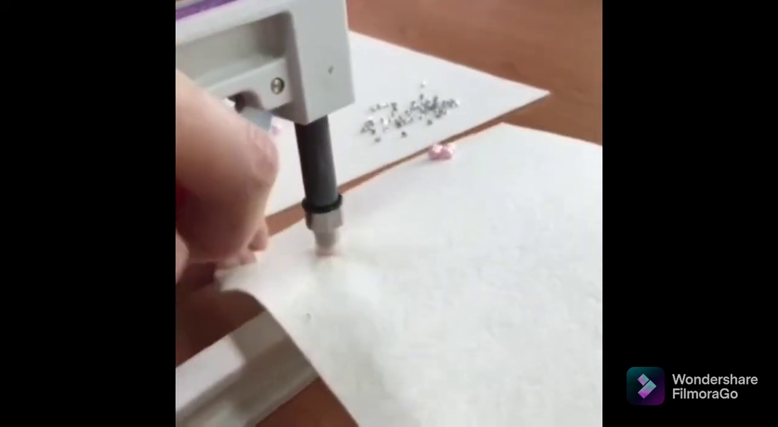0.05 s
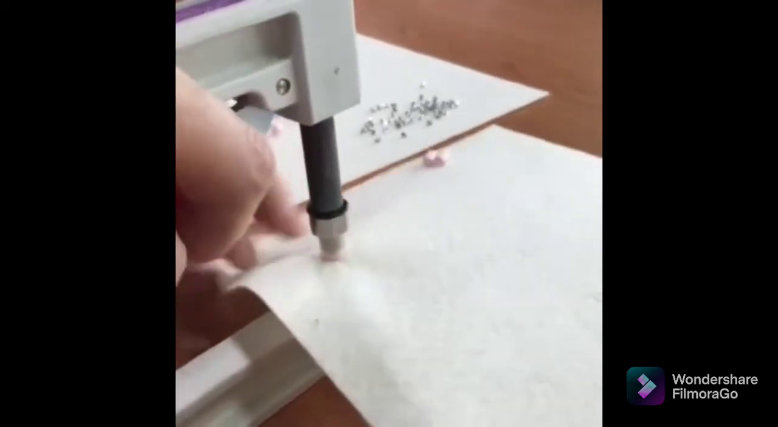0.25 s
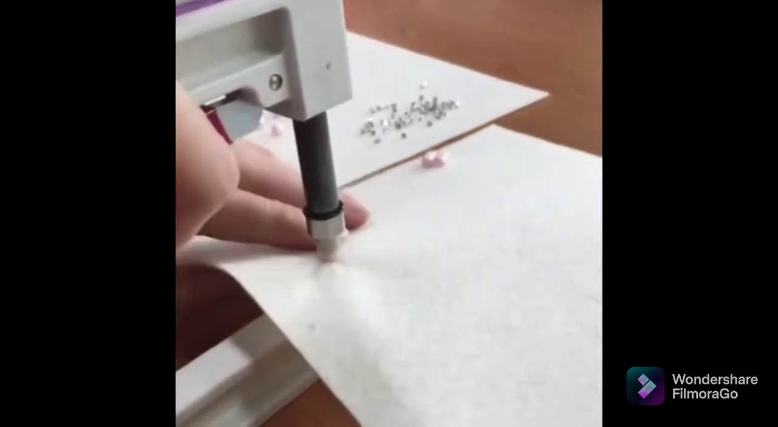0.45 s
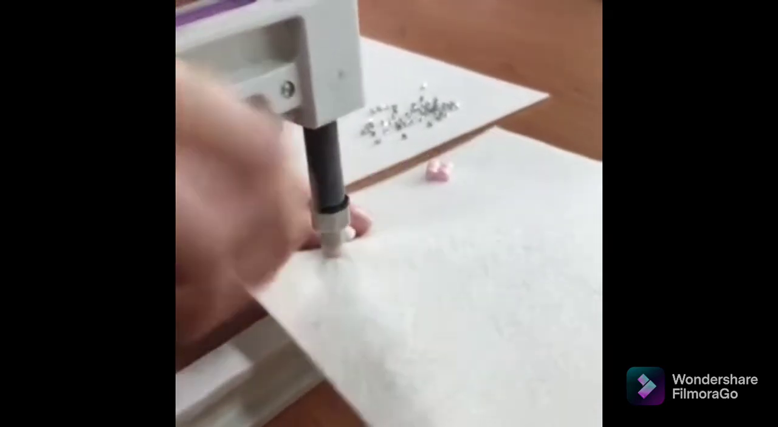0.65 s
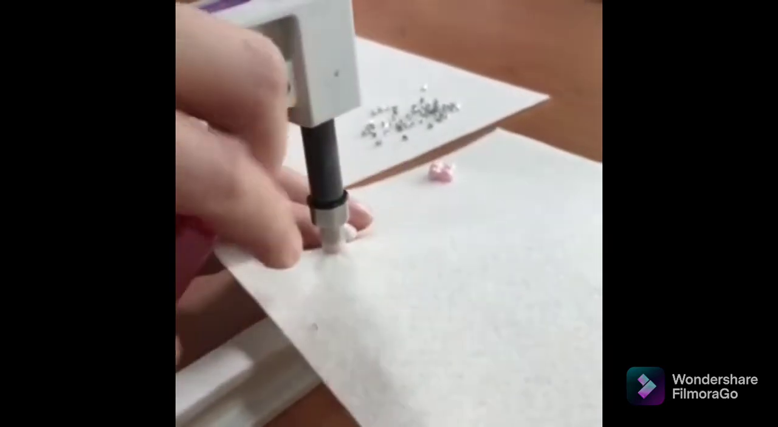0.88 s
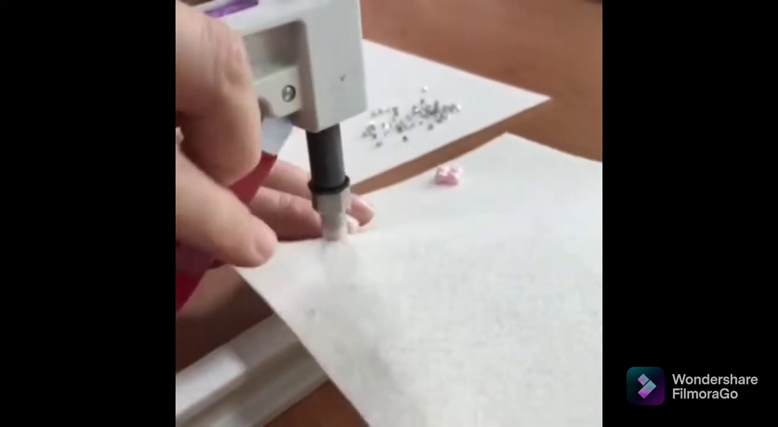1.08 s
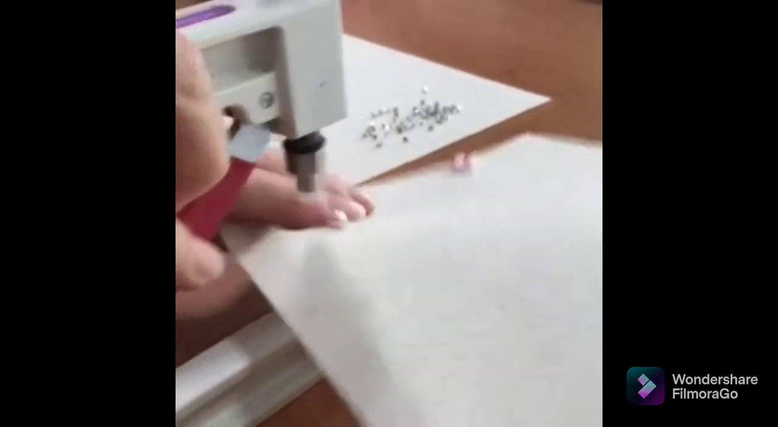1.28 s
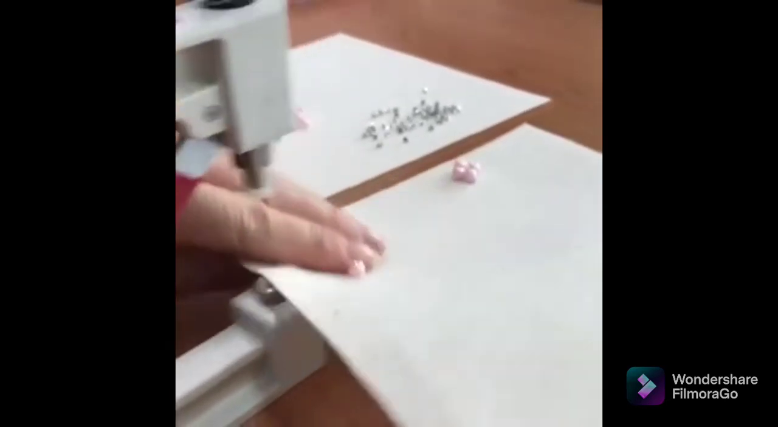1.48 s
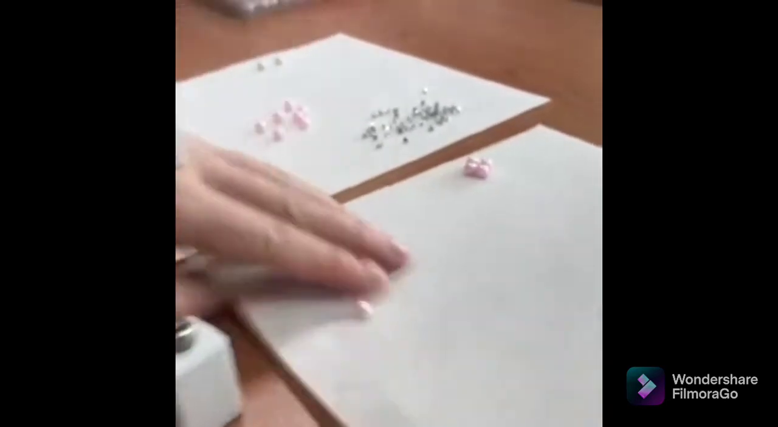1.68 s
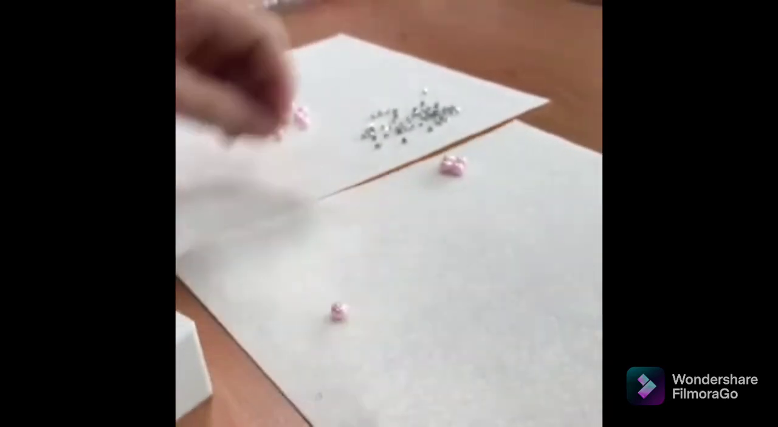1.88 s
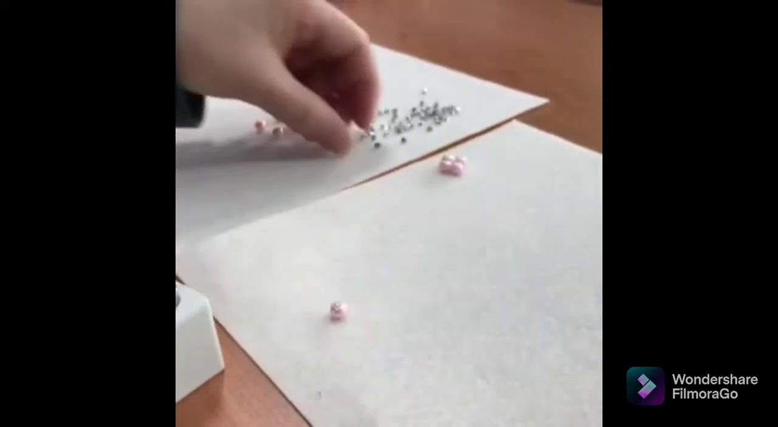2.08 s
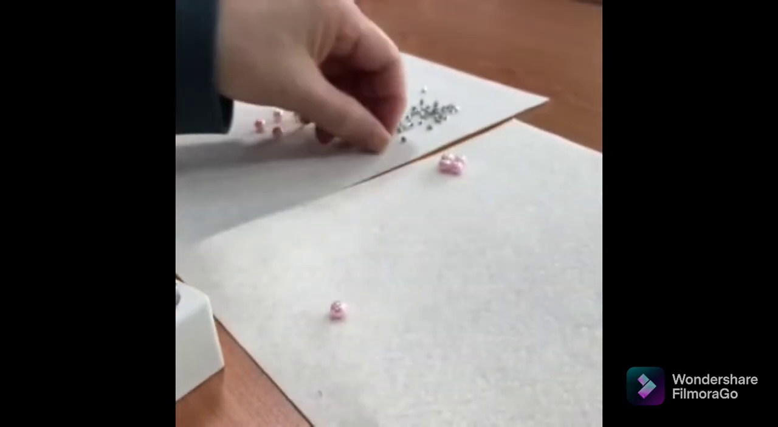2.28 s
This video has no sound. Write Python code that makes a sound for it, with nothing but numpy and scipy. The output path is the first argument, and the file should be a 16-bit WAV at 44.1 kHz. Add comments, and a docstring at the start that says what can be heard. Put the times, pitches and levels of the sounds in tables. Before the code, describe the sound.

A hand press snaps shut at about 0.25 seconds, a sharp metal crack with a table thump and a faintly ringing spring. Small ticks follow, then it snaps open at 0.8 seconds with another thump. After a dry clack near 1.45 seconds, it rubs across the wooden table until 2.3, groaning briefly around 1.8 as cloth rustles faintly. A bead ticks at 2.4. The room is small and quiet.

```python
"""In a small, quiet room with a faint whine, a hand press on a wooden table sets a bead into cloth.
The press snaps shut, metal on metal, thumping the table and leaving its spring singing faintly.
It creaks under load while a faint background hiss swells and fades, then snaps open with a second thump.
It comes away with a dry clack and is slid aside in two strokes, rubbing and briefly groaning
as the cloth rustles. Last, a loose bead ticks."""
import sys
import numpy as np
from scipy import signal
from scipy.fft import rfft, irfft, next_fast_len
from scipy.io import wavfile

SR = 44100
rng = np.random.default_rng(int(sys.argv[2]) if len(sys.argv) > 2 else 0)


def file_out(sig):
    """Save sig as 16-bit WAV at sys.argv[1]."""
    # one column per channel
    cols = np.atleast_2d(sig).T
    # limit, then scale
    lim = np.clip(cols, -1, 1)
    pcm = np.round(lim * 32767).astype(np.int16)
    wavfile.write(sys.argv[1], SR, pcm)


N = 108045
T = np.arange(N) / SR


def from_db(db):
    """Turn decibels into a number to multiply by."""
    return 10 ** (np.asarray(db) / 20)


def at_hz(rows, hz, column=1):
    """Read a table at any pitch, blending between its rows."""
    rows = np.array(rows)
    return np.interp(np.log(hz + 1e-9), np.log(rows[:, 0]), rows[:, column])


def noise(gain_at, grain=0.):
    """Noise of average size (rms) one, shaped by a gain for each pitch; grain makes it crackly."""
    source = rng.standard_normal(N)
    if grain:
        source *= np.exp(grain * rng.standard_normal(N))
    size = next_fast_len(N, True)
    hz = np.arange(size // 2 + 1) * SR / size
    shaped = irfft(rfft(source, size) * gain_at(hz), size)[:N]
    return shaped / np.sqrt(np.mean(shaped ** 2) + 1e-20)


def coloured(tone, grain=0.):
    """Noise whose mix of low and high follows a table."""
    return noise(lambda hz: from_db(at_hz(tone, hz)), grain)


def band(centre_hz, octaves):
    """Noise around one pitch, with soft edges."""
    return noise(lambda hz: 1 / (1 + (np.log2((hz + 1) / centre_hz) / octaves / 2) ** 2) ** 2)


def drift(rate_hz):
    """A random wobble; a higher rate makes it quicker."""
    return noise(lambda hz: np.exp(-(hz / rate_hz) ** 2))


def burst(start, rise_s, fade_s):
    """A quick rise, then a fade. A fade time is how long a sound takes to drop 60 dB."""
    age = np.maximum(T - start, 0)
    return np.minimum(age / rise_s, 1) * from_db(-60 * np.maximum(age - rise_s, 0) / fade_s)


def click(start):
    """A push just one sample long."""
    return 1. * (np.arange(N) == int(start * SR))


def ring(force, notes, step):
    """A struck object's fading notes. Note k is scaled by step ** k, so minus flips every other one."""
    out = np.zeros(N)
    for k, (hz, db, fade_s) in enumerate(notes):
        decay = np.exp(-np.log(1000) / (fade_s * SR))
        angle = 2 * np.pi * hz / SR
        feedback = [1, -2 * decay * np.cos(angle), decay ** 2]
        out += step ** k * from_db(db) * signal.lfilter([0, np.sin(angle)], feedback, force + 1e-18)
    return out


# The tone of the room's air. Each row: pitch in Hz, relative level in dB.
AIR_TONE = [(15, -33), (25, -11), (72, 0.5), (123, -6), (301, -1.5), (384, -8), (427, -14), (591, -11),
            (1100, -19), (1290, -13), (1520, -23.5), (2110, -22.5), (2610, -27), (2840, -27), (16000, -48)]
# Hums and whines. Each row: pitch in Hz, level in dB, width in octaves.
ROOM_WHINES = [(58.4, -60.5, 0.062), (209, -58, 0.068), (1327.5, -65.5, 0.018), (2175, -72, 0.013)]
def background(air_db=-49):
    """Room air with faint, wavering hums and whines."""
    whines = sum(from_db(db) * band(hz, octaves) for hz, db, octaves in ROOM_WHINES)
    return from_db(air_db) * coloured(AIR_TONE) + whines


def contact(start, high_hz, low_hz):
    """The force of one blow: soft blows lack treble, light ones lack bass."""
    force = signal.sosfilt(signal.butter(2, high_hz, fs=SR, output="sos"), click(start) + 1e-18)
    return signal.sosfilt(signal.butter(2, low_hz, "high", fs=SR, output="sos"), force)


# The notes of the table with the press on it. Each row: pitch in Hz, base level in dB, fade in seconds.
TABLE_NOTES = [(135, -7, 0.043), (220, 0, 0.073), (300, -8, 0.077), (380.5, -16, 0.094), (580.7, -3, 0.061),
               (744, -18, 0.069), (913, -5.5, 0.056), (1036, -16, 0.11), (1212, -17.5, .04),
               (1397, -16, 0.041)]
# Blows. Each row: start in seconds, strength in dB, treble cut-off in Hz, bass cut-off in Hz.
TABLE_BLOWS = [(0.0162, -26.5, 430, 30), (0.184, -32.5, 990, 445), (0.2423, -12.5, 3500, 30),
               (0.3618, -26, 890, 120), (.569, -37, 990, 248), (.735, -38.5, 1500, 400),
               (0.786, -31, 900, 150), (0.8188, -21, 1500, 130), (.828, -28, 600, 150),
               (.862, -30, 700, 30), (1.162, -31, 300, 30.2), (1.195, -34.5, 249, 29.86),
               (1.508, -34, 250, 30.03), (1.61, -25.5, 450, 30)]
def table_knocks():
    """Every blow rings the same notes in the wooden table."""
    force = sum(from_db(db) * contact(start, high, low) for start, db, high, low in TABLE_BLOWS)
    return ring(force, TABLE_NOTES, step=-0.93)


# Shifts of weight on the table. Each row: start in seconds, level in dB.
TABLE_SHOVES = [(0.016, -43), (0.248, -26), (0.365, -36.5), (0.743, -29.5), (0.821, -31), (0.859, -46),
                (1.159, -51)]
def table_bob(hz=58.6, rise_s=0.0091, fade_s=0.1375):
    """The whole table top bobs under each shove, making a deep bump."""
    return sum(from_db(db) * burst(start, rise_s, fade_s) * np.sin(2 * np.pi * hz * (T - start))
               for start, db in TABLE_SHOVES)


# Jolts of the handle and casing. Each row: start in seconds, level in dB, fade in seconds.
CASING_JOLTS = [(.184, -47, .04), (0.3618, -28.5, .045), (.787, -37, 0.022), (.8193, -28, .035),
                (.863, -35, .04), (1.614, -36.5, 0.038), (2.078, -37, 0.027)]
# The casing's tone. Each row: pitch in Hz, relative level in dB.
CASING_TONE = [(80, -7.5), (300, -4), (560, 3), (800, -4), (1100, -9), (1700, -18), (2300, -27),
               (6000, -44)]
def clunks(rise_s=0.00083):
    """The casing's many short-lived notes blur into a dull clunk at each jolt."""
    jolts = sum(from_db(db) * burst(start, rise_s, fade_s) for start, db, fade_s in CASING_JOLTS)
    return jolts * coloured(CASING_TONE)


def seating(start, free_s=0.009, damping_db_per_s=2501):
    """The loudness of a snap: the metal rings freely for a moment, then settles and is hushed."""
    return from_db(-damping_db_per_s * np.maximum(T - start - free_s, 0))


SHUT_S, OPEN_S = 0.2431, 0.8176
# The notes of the punch driving the rivet home. Each row: pitch in Hz, base level in dB, fade in seconds.
PUNCH_NOTES = [(2264, -17, 0.022), (3016, -16, .026), (3260, -19, .024), (3650, -16, 0.0086),
               (4060, -16, 0.0087), (4440, -12, 0.01004), (6030, -11.5, 0.0077), (6370, -12, 0.0066),
               (6830, -18, 0.0054), (8000, -27.5, .009), (8520, -22.5, 0.013), (11380, -22.5, .011),
               (12720, -24.5, .014), (15590, -24.5, .012)]
# The tone of its crack. Each row: pitch in Hz, relative level in dB.
SHUT_TONE = [(300, -28), (1700, 8.5), (2600, 3), (3900, 8.5), (4900, 2), (6300, 7.5), (9500, -3.5),
             (12000, 0.5), (16000, 1)]
def snap_shut():
    """The punch lands hard: a bright crack, a short metal ring and the room's echo."""
    crack = from_db(-12.5) * coloured(SHUT_TONE) * burst(SHUT_S - 0.0007, rise_s=0.0018, fade_s=0.0105)
    metal = ring(click(SHUT_S), PUNCH_NOTES, step=-0.99)
    return (crack + metal) * seating(SHUT_S) + room_echo(SHUT_S, level_db=-31.5, dull_db_per_octave=-0.2)


# The room's answer to a snap. Each row: pitch in Hz, relative level in dB, fade in seconds.
ECHO_BANDS = [(59.9, 0, 0.36), (120, 5, 0.51), (211, 13, .6), (400, -5.5, 0.83), (785, -8, 0.81),
              (1080, -3.5, 0.7), (1467, -7, 0.42), (1909, -18.5, 0.67), (2607, -19.5, 0.7),
              (3300, -13, 0.75), (4214, -17.5, .65), (4794, -22.5, 0.59), (5700, -18, 0.66),
              (6750, -27, .5), (9000, -27.5, 0.31), (15000, -33.5, 0.52)]
def room_echo(start, level_db, dull_db_per_octave, rise_s=0.0033, flutter_db=1.5):
    """A fluttering wash of noise; each third of an octave dies away at its own speed."""
    centres = 62.5 * 2 ** (np.arange(25) / 3)
    gains = from_db(at_hz(ECHO_BANDS, centres)) * np.sqrt(centres)  # higher bands are wider
    gains /= np.linalg.norm(gains)
    gains *= from_db(-dull_db_per_octave * np.log2(np.maximum(centres / 1000, 1)))  # above 1000 Hz
    level = from_db(level_db + flutter_db * drift(161.5))
    echo = np.zeros(N)
    for centre, gain in zip(centres, gains):
        third = noise(lambda hz: abs(np.log2((hz + 1) / centre)) < 1 / 6)
        echo += gain * third * burst(start, rise_s, fade_s=at_hz(ECHO_BANDS, centre, column=2))
    return level * echo


# The return spring's notes. Each row: pitch in Hz, level in dB, fade in seconds.
SPRING_NOTES = [(2980, -54.5, 0.254), (3230, -51, 0.595), (3450, -54.5, 0.57), (4280, -51, .42)]
def spring(octaves=0.0079, rise_s=0.0034):
    """The spring sings on after the punch, wavering as it dies."""
    return sum(from_db(db) * band(hz, octaves) * burst(SHUT_S, rise_s, fade_s)
               for hz, db, fade_s in SPRING_NOTES)


# The first hard instant of metal on metal in each snap, then small clicks of the mechanism and beads.
# Each row: start in seconds, level in dB, pitch in Hz, width in octaves, fade in seconds.
METAL_HITS = [(.2432, -16.5, 4150, .2, .005), (.8175, -23.5, 10500, .28, 0.0032)]
SMALL_CLICKS = [(.2555, -46, 4540, .6, 0.026), (.267, -50, 5500, 0.64, 0.021),
                (.556, -53.5, 2430, 0.22, 0.039), (0.573, -54, 2530, 0.22, 0.048),
                (0.64, -51.5, 2450, .25, 0.016), (0.693, -50.5, 2460, 0.21, 0.024),
                (0.736, -46.5, 2320, 0.33, 0.027), (0.7508, -53, 5500, 1.04, .012),
                (0.8506, -38, 3150, 0.39, 0.0067), (0.862, -47.5, 3400, 0.45, 0.025),
                (1.5775, -45, 3257, 0.061, 0.031), (1.578, -54, 6860, 0.68, 0.031),
                (1.628, -58.5, 9000, 0.76, 0.023), (1.958, -52, 7000, .9, .012),
                (2.399, -53, 7000, 0.87, 0.0079)]
def ticks(rows, rise_s):
    """Hard parts touch in short, dry clicks, each around its own pitch."""
    return sum(from_db(db) * band(hz, octaves) * burst(start, rise_s, fade_s)
               for start, db, hz, octaves, fade_s in rows)


# Swells of soft hiss. Each row: start in seconds, length in seconds, level in dB.
HISS_SWELLS = [(0.33, 0.34, -60.5), (1.0, 0.14, -68), (1.439, 0.12, -58), (1.656, 0.23, -59),
               (1.752, 0.058, -60), (1.89, 0.034, -54.5), (1.956, 0.019, -49), (1.966, 0.024, -53.5)]
# The tone of the hiss. Each row: pitch in Hz, relative level in dB.
HISS_TONE = [(1000, 2), (3300, 0.5), (6000, -2.5), (10000, -6), (14000, -7), (16000, -21)]
def soft_hiss():
    """A faint background hiss swells and fades between the snaps; later swells are rustling cloth."""
    swells = sum(from_db(db) * np.maximum(1 - (2 * (T - start) / length - 1) ** 2, 0)
                 for start, length, db in HISS_SWELLS)
    return swells * coloured(HISS_TONE, grain=0.6)


# The plunger's notes. Each row: pitch in Hz, base level in dB, fade in seconds.
PLUNGER_NOTES = [(1905, -32, 0.056), (2123, -33.5, 0.054), (2450, -27, 0.018), (2990, -37.5, 0.048),
                 (3400, -39, 0.038), (4030, -31, .016), (4360, -25.5, 0.024), (5370, -40, 0.03),
                 (7900, -45, .02), (8780, -21.5, 0.011), (9100, -16, 0.0073), (10400, -19, .003),
                 (11840, -29, 0.0055)]
# The tone of its crack. Each row: pitch in Hz, relative level in dB.
OPEN_TONE = [(100, -12), (400, 3), (1500, -7), (2500, -7), (4300, -15.5), (7000, -18), (9500, -10),
             (12000, -13.5), (16000, -14)]
def snap_open():
    """The plunger springs free: a lighter crack, a short ring and a duller echo."""
    crack = from_db(-25) * coloured(OPEN_TONE) * burst(OPEN_S - 0.0001, rise_s=0.00013, fade_s=0.016)
    metal = ring(click(OPEN_S), PLUNGER_NOTES, step=-0.99)
    return (crack + metal) * seating(OPEN_S) + room_echo(OPEN_S, level_db=-35.5, dull_db_per_octave=6)


def loudness(rows):
    """Join points of time and dB into a smooth volume curve, silent outside them."""
    times, levels_db = np.transpose(rows)
    return from_db(np.interp(T, times, levels_db, left=-120, right=-120))


# How loud the rubbing and the table's rumble are. Each row: time in seconds, level in dB.
RUB_LEVELS = [(1.44, -61), (1.47, -42), (1.495, -44.5), (1.53, -58.5), (1.63, -49), (1.68, -40.5),
              (1.75, -37), (1.81, -40), (1.87, -36.5), (1.93, -47.5), (1.99, -51), (2.05, -59),
              (2.09, -48.5), (2.17, -45), (2.24, -50.5), (2.29, -73)]
RUMBLE_LEVELS = [(1.44, -68), (1.5, -43.5), (1.65, -49), (1.72, -47), (1.8, -47.5), (1.88, -40),
                 (1.94, -46.5), (1.99, -42), (2.05, -58.5), (2.13, -37.5), (2.2, -43), (2.3, -64)]
# Their tones. Each row: pitch in Hz, relative level in dB.
RUB_TONE = [(150, -11), (450, -14), (570, 3.5), (640, -1), (710, 1.5), (870, -4), (970, -8), (1160, -8),
            (1600, -15), (2250, -21), (2650, -26), (3100, -21.5), (6000, -43), (10000, -40), (16000, -47)]
RUMBLE_TONE = [(40, -38), (120, -20), (165, -11), (200, 2), (240, -7), (300, -11), (450, -21), (900, -65)]
def sliding(rough_db=0.5, lurch_db=1.5):
    """The press rubs unevenly over the wood, and the table rumbles under it."""
    rub = loudness(RUB_LEVELS) * coloured(RUB_TONE, grain=0.55) * from_db(rough_db * drift(60))
    rumble = loudness(RUMBLE_LEVELS) * coloured(RUMBLE_TONE) * from_db(lurch_db * drift(15))
    return rub + rumble


# The clack's notes. Each row: pitch in Hz, base level in dB, fade in seconds.
CLACK_NOTES = [(400, -31, .006), (1500, -22, 0.0036), (4220, -24.5, 0.0027), (5880, -28.5, 0.0031),
               (9070, -31, 0.0024)]
def clack(start=1.4521):
    """One very dry clack as the press comes away."""
    return ring(click(start), CLACK_NOTES, step=-1.05)


def swell(peak_s, spread_s):
    """A smooth, bell-shaped rise and fall."""
    return np.exp(-((T - peak_s) / spread_s) ** 2 / 2)


# Scuffs. Each row: peak time in seconds, spread in seconds, level in dB, pitch in Hz, width in octaves.
SLIDE_SCUFFS = [(1.487, .018, -45, 830, .13), (1.78, .05, -57, 2900, .12), (1.865, 0.029, -43, 324, 0.43)]
def scuffs():
    """Friction swells briefly during the slide, each time around its own pitch."""
    return sum(from_db(db) * swell(peak_s, spread_s) * band(hz, octaves)
               for peak_s, spread_s, db, hz, octaves in SLIDE_SCUFFS)


# The scrape's notes. Each row: pitch as a multiple of the lowest note, relative level in dB.
SCRAPE_NOTES = [(1, -2.5), (1.19, -3.5), (1.42, -9), (2.05, -14.5), (3.9, -25.5)]
def scrape(peak_s=1.79, hz=588, sink_hz_per_s=700, width_hz=24):
    """Unsteady notes sink in pitch as the long slide swells and fades."""
    pitch = hz - sink_hz_per_s * (T - peak_s)
    phase = 2 * np.pi * np.cumsum(pitch) / SR
    notes = np.zeros(N)
    for ratio, db in SCRAPE_NOTES:
        wavering = drift(width_hz) * np.sin(ratio * phase) + drift(width_hz) * np.cos(ratio * phase)
        notes += from_db(db) * wavering
    return from_db(-38) * swell(peak_s, spread_s=0.07) * notes


# Judders of the press's foot. Each row: start in seconds, length in seconds, level in dB.
FOOT_JUDDERS = [(1.783, 0.066, -29), (1.967, 0.078, -40)]
def groans(hz=558, wobble=0.018, rise_s=0.007, sink_hz_per_s=500):
    """The sliding foot judders, making short groans that sag in pitch."""
    pitch = hz * (1 + wobble * drift(48.5))
    level = np.zeros(N)
    for start, length, db in FOOT_JUDDERS:
        sounding = (T >= start) & (T < start + length)
        pitch -= sink_hz_per_s * (T - start - length / 2) * sounding
        level += from_db(db) * np.interp(T, [start, start + rise_s, start + length], [0, 1, 0])
    return level * np.sin(2 * np.pi * np.cumsum(pitch) / SR)


def scene():
    """All the sounds add up at one close microphone."""
    thumps = table_knocks() + table_bob() + clunks()
    snaps = snap_shut() + spring() + snap_open() + ticks(METAL_HITS, rise_s=0.00017)
    small_sounds = ticks(SMALL_CLICKS, rise_s=0.00076) + soft_hiss()
    slide = sliding() + clack() + scuffs() + scrape() + groans()
    return (background() + thumps + snaps + small_sounds + slide)[None]


def record(dry, low_cut_hz=40, high_cut_hz=16100):
    """The microphone loses the deep bass, and the highest treble is cut."""
    thin = signal.sosfilt(signal.butter(4, low_cut_hz, "high", fs=SR, output="sos"), dry)
    return signal.sosfilt(signal.ellip(10, .2, 80, high_cut_hz, fs=SR, output="sos"), thin)


dry = scene()
out = record(dry)
file_out(out)
```